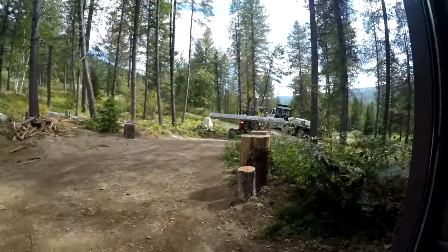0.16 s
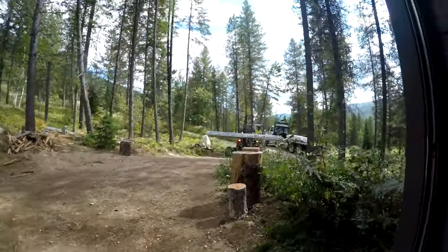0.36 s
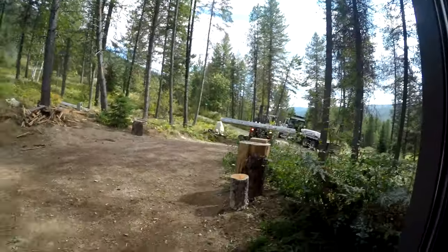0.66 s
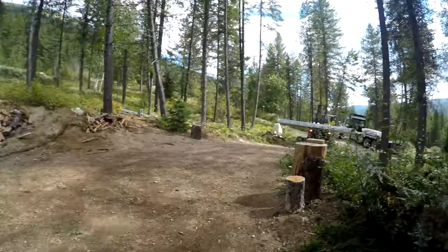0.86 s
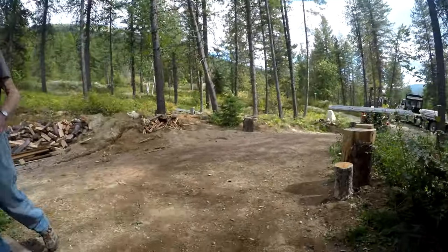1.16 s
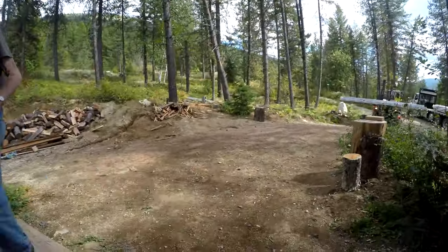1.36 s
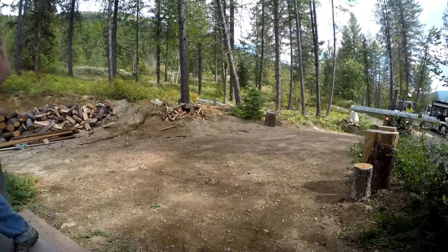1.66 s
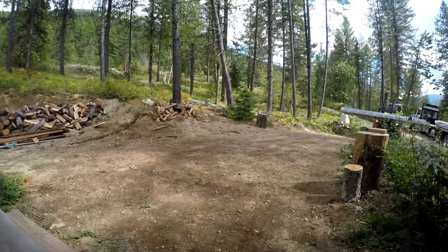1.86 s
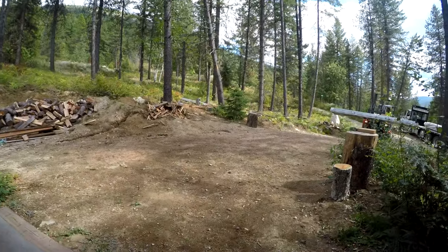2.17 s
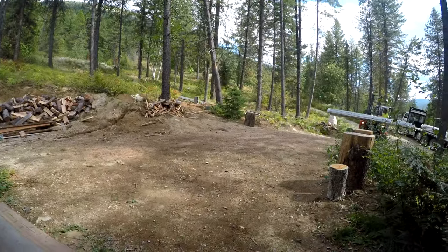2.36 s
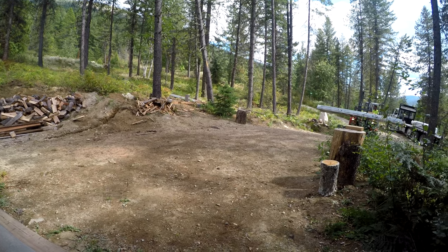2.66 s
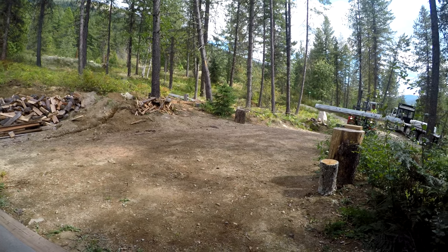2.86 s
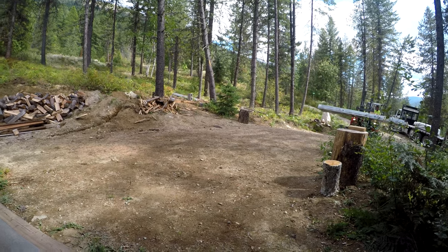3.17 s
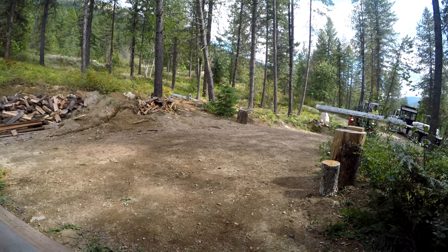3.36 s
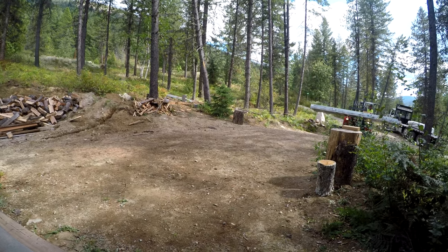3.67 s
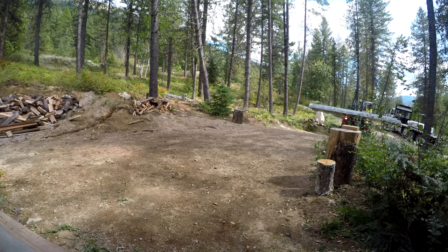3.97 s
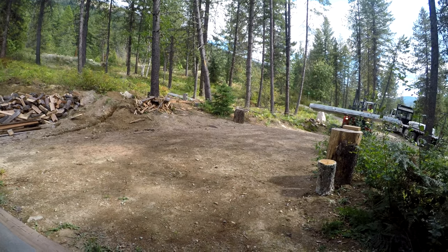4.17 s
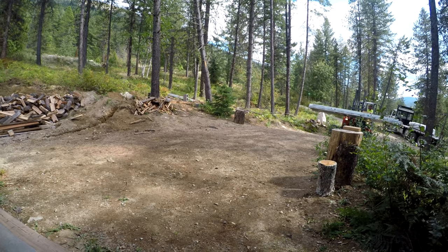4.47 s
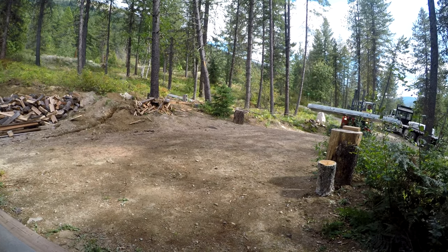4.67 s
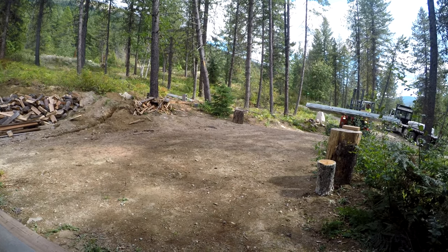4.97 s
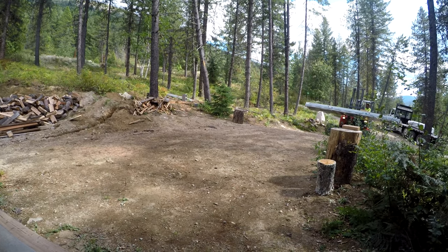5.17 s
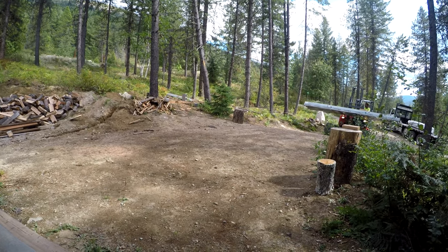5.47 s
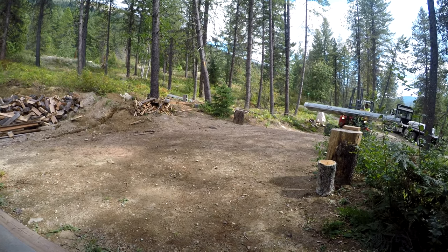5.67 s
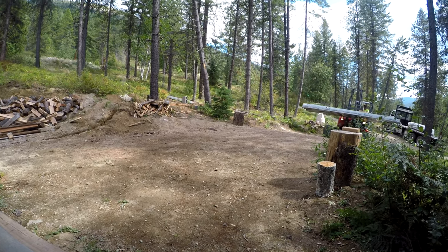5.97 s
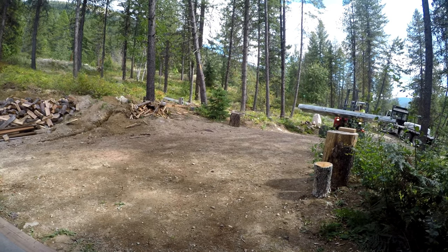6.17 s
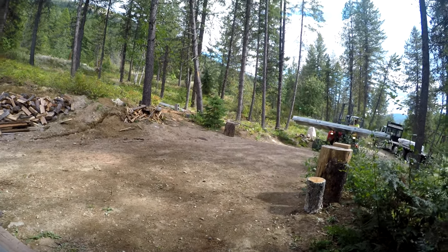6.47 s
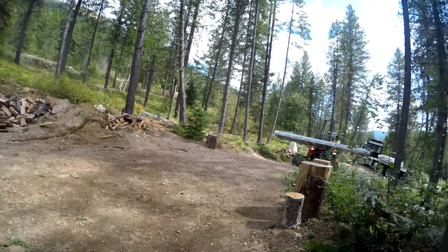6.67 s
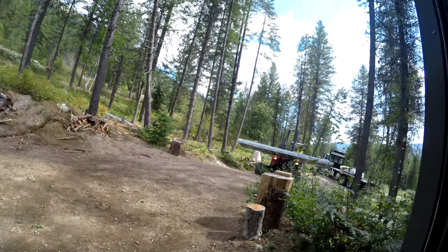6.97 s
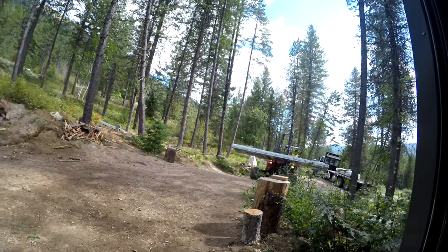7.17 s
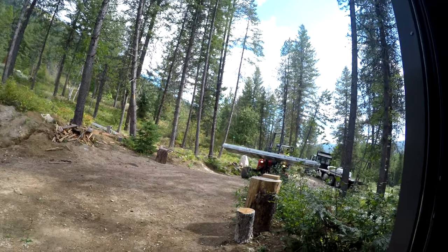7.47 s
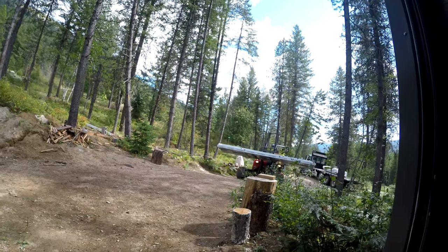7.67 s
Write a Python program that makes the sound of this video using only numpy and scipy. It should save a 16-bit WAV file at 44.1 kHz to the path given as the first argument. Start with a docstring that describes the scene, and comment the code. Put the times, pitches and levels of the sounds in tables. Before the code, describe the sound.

Steady low diesel throb and idling lorry outdoors, pump whine flickering on top, one woody heel knock early, gritty scuffs and ticking near the end.

```python
"""Forklift and idling lorry in a dirt yard

A three-cylinder diesel forklift works while its six-cylinder lorry idles: sines at multiples of each engine's cycle rate.
Noise shaped by spectra makes exhaust, engine body, fan and hiss; short bursts through resonances make the ticks.
A thin whistle flutters and clothing rustles. Filtered noise makes a broad burst as the sound begins, then
someone near scuffing over boards and grit.
The two microphone ports differ in level and phase across the band, most plainly in its middle."""
import sys
import numpy as np
from scipy import signal
from scipy.fft import rfft, irfft, next_fast_len
from scipy.io import wavfile
from scipy.ndimage import uniform_filter1d, minimum_filter1d, map_coordinates

SR = 44100
rng = np.random.default_rng(int(sys.argv[2]) if len(sys.argv) > 2 else 0)


def inscribe(sig):
    """Save sig as 16-bit PCM at rate SR to the path in sys.argv[1].

    A 1-D sig is mono; a 2-D sig holds one channel per row.
    Samples are clipped to [-1, 1] before scaling.
    """
    pcm = np.round(np.clip(np.atleast_2d(sig).T, -1, 1) * 32767)
    wavfile.write(sys.argv[1], SR, pcm.astype(np.int16))


N = 344862  # samples


def amp(db):
    """Amplitude factor for a level in dB."""
    return 10 ** (np.asarray(db) / 20)


def unit(x):
    """x brought to an rms of one."""
    return x / np.sqrt(np.mean(x ** 2) + 1e-20)


def along(points, hz):
    """Read (Hz, value) points on a log frequency axis."""
    f, v = np.transpose(points)
    return np.interp(np.log(hz + 1), np.log(f + 1), v)


def curves(rows):
    """One value per sample for each column after the time."""
    s, *columns = np.transpose(rows)
    return [np.interp(np.arange(N) / SR, s, column) for column in columns]


def wobble(rate):
    """A smooth random curve with rate knots a second."""
    coarse = np.arange(0, N + 64, 64)
    knots = rng.standard_normal(int(N * rate / SR) + 4)
    return np.interp(np.arange(N), coarse, map_coordinates(knots, [coarse * rate / SR]))


def filtered(x, response):
    """x times a complex response of frequency."""
    m = next_fast_len(N + SR // 2)
    return irfft(rfft(x, m) * response(np.fft.rfftfreq(m, 1 / SR)), m)[..., :N]


def coloured(x, spectrum):
    """x shaped by a spectrum in dB, then brought to an rms of one."""
    return unit(filtered(x, lambda hz: amp(along(spectrum, hz))))


def noise():
    """Two unrelated white noises."""
    return rng.standard_normal((2, N))


def tone(turns, db, waver_db):
    """A sine on a running phase, db rms, whose level wavers."""
    level = np.sqrt(2) * amp(db + waver_db * wobble(9))
    return level * np.sin(2 * np.pi * (turns + rng.random()))


# Forklift engine speed. Each row: time in seconds, cycles a second.
SPEED = [(0, 12.38), (.5, 12.49), (1.07, 12.46), (1.13, 12.624), (1.33, 12.651), (1.66, 12.656),
         (1.8, 12.78), (1.97, 12.8), (2.08, 12.7), (2.16, 12.7), (2.5, 12.705), (2.66, 12.622),
         (3.1, 12.57), (3.49, 12.643), (3.83, 12.573), (4.33, 12.715), (5.16, 12.711), (5.66, 12.663),
         (6.49, 12.664), (6.7, 12.585), (6.82, 12.596), (6.97, 12.735), (7.1, 12.735), (7.3, 12.632),
         (7.67, 12.63), (7.82, 12.75)]


def cycle():
    """Running count of forklift engine cycles."""
    return np.cumsum(curves(SPEED)[0]) / SR


# Swell of the fan roar, followed in part by other layers. Each row: time in seconds, gain in dB.
SWELL = [(0, 4), (.25, 2.5), (1, -1.5), (1.3, 2), (2, 0), (6.3, 0), (6.5, 5.5), (7, 5), (7.3, 5.5),
         (7.5, 7.5), (7.82, 6.5)]


def swell():
    """Gain in dB at each sample as the fan roar comes forward and draws back."""
    return curves(SWELL)[0]


def shade():
    """Gain in dB: some middle overtones start 10.5 dB lower and climb over the first 3.2 s."""
    return -10.5 * np.clip(1 - np.arange(N) / SR / 3.2, 0, 1)


# Forklift engine orders. Each row: multiple of the cycle rate, level in dB rms before any waver, swell or shade.
ORDERS = [(3.0, -28), (6.0, -23), (9.0, -29), (19.0, -40), (22.0, -35), (30.0, -37), (31.0, -36),
          (33.0, -36), (35.0, -42), (37.0, -35), (38.0, -43), (39.0, -38), (44.0, -44), (45.0, -44),
          (47.0, -43), (48.0, -42), (57.0, -52), (59.0, -54), (66.0, -56), (67.0, -60), (68.0, -56),
          (69.0, -53), (70.0, -58), (71.0, -59), (73.0, -60), (74.0, -58), (75.0, -59), (76.0, -62),
          (78.0, -60), (80.0, -57), (87.0, -60), (90.0, -51), (91.0, -59), (92.0, -52), (93.0, -54),
          (94.0, -60), (96.0, -59), (99, -63), (104, -63), (106, -60), (109, -62), (110, -64), (41, -43),
          (102, -63), (115, -64)]
KNOCK_LOW, KNOCK_HIGH = 87, 96  # orders in this range belong to the knock


def engine_orders():
    """Firing and rotating parts sound at multiples of the cycle rate, so they follow the speed."""
    turns = cycle()
    return sum(tone(k * turns, db, waver_db=0.2) for k, db in ORDERS if not KNOCK_LOW <= k <= KNOCK_HIGH)


def engine_knock():
    """High orders in step peak together once a cycle, which makes a pulse."""
    turns = cycle() - .55  # the peak falls at this share of the cycle
    gain_db = shade() + .5 * swell()
    return sum(np.sqrt(2) * amp(db + gain_db) * np.cos(2 * np.pi * k * turns)
               for k, db in ORDERS if KNOCK_LOW <= k <= KNOCK_HIGH)


# Gear hum. Each row: time in seconds, level in dB rms before its waver.
GEAR = [(0.0, -18), (0.06, -15.5), (1.22, -22.5), (1.37, -31), (1.39, -23), (1.74, -27), (2.18, -20),
        (2.52, -26), (2.68, -21), (2.9, -37), (2.98, -23), (3.31, -21), (3.33, -26.5), (3.96, -18.5),
        (4.16, -26), (4.2, -21.5), (4.44, -24.5), (5.34, -21), (6.62, -24.5), (6.66, -19), (6.82, -20.5),
        (6.97, -33.5), (7.08, -23), (7.82, -25)]
# Hydraulic pump hum. Each row: time in seconds, level in dB rms before its waver.
PUMP = [(0.0, -38), (0.04, -28.5), (1.04, -28.5), (1.11, -34), (1.15, -26.5), (2.07, -20), (2.5, -21.5),
        (2.59, -43.5), (2.72, -26.5), (3.11, -35), (3.94, -36), (4.01, -24.5), (4.22, -27), (4.85, -21.5),
        (5.51, -27), (6.18, -24.5), (6.49, -36.5), (6.51, -27.5), (6.73, -36), (6.86, -21), (7.14, -17),
        (7.43, -34.5), (7.8, -18.5), (7.82, -23)]
# Fan blade tone. Each row: time in seconds, level in dB rms before its waver.
BLADES = [(0, -35.5), (.35, -24.5), (.55, -23), (.8, -21.5), (1.1, -29), (1.4, -34), (2.2, -46), (3.4, -31),
          (4.2, -38), (5.1, -36.5), (6.1, -27.5), (6.5, -32.5), (6.75, -28.5), (7.82, -38.5)]


def hums():
    """Gear, pump and fan blades each hum at a multiple of the cycle rate."""
    turns = cycle()
    gear = tone(24 * turns, curves(GEAR)[0], waver_db=1.0)
    pump = tone(36 * turns, curves(PUMP)[0], waver_db=1.16)
    blades = tone(20.5 * turns, curves(BLADES)[0], waver_db=3.0)
    return gear + pump + blades


# Middle pump overtones. Each entry: multiple of the cycle rate, then level in dB rms before
# waver, swell and shade, and share of the swell.
MIDDLE_OVERTONES = {54: (-38, .2), 72: (-43.5, 0)}
# Lower sideband of the whine and higher pump overtones. Each row: time in seconds, then the level
# in dB rms, before its waver, of multiples 105, 144, 180 and 252 of the cycle rate.
UPPER_OVERTONES = [(0, -61.5, -64, -71.5, -72), (1.5, -54, -63, -79, -69), (2.4, -52.5, -62, -77, -71.5),
                   (3.3, -49, -64, -80, -70.5), (4.8, -52.5, -70.5, -78, -71.5), (5.3, -48, -70, -86, -71),
                   (6.2, -50, -63.5, -78, -73.5), (6.5, -47, -61, -67.5, -67.5), (7.0, -45, -63, -64, -70),
                   (7.3, -42, -63, -57.5, -65), (7.45, -44, -63, -65, -53), (7.7, -50, -62, -62, -53),
                   (7.82, -52, -62, -63, -59)]


def pump_overtones():
    """Harmonics of the pump, and a sideband of its whine, each waver in level."""
    turns, swell_db, shade_db = cycle(), swell(), shade()
    middle = sum(tone(k * turns, db + share * swell_db + shade_db * (k == 72), waver_db=1.14)
                 for k, (db, share) in MIDDLE_OVERTONES.items())
    upper_levels = zip((105, 144, 180, 252), curves(UPPER_OVERTONES))
    return middle + sum(tone(k * turns, db, waver_db=2.5) for k, db in upper_levels)


# Pump whine under load. Each row: time in seconds, level in dB rms before its waver.
WHINE = [(0, -50), (.15, -47), (.3, -46), (.54, -44), (.72, -45), (.85, -43), (.94, -43), (1.07, -40),
         (1.2, -39.5), (1.28, -41), (1.37, -36), (1.62, -40.5), (1.74, -37), (1.85, -44), (1.98, -41.5),
         (2.1, -45), (2.35, -42.5), (2.52, -45.5), (2.7, -53), (3.1, -48), (3.5, -50.5), (3.8, -42.5),
         (4.1, -49), (4.7, -47), (5.1, -51.5), (5.5, -50), (5.85, -43.5), (6.2, -48), (6.45, -41),
         (6.85, -45), (7.0, -43), (7.28, -40.5), (7.34, -36), (7.45, -35.5), (7.82, -36)]
# Breaks in the whine. Each row: middle in seconds, length in seconds.
BREAKS = [(0.788, 0.079), (1.112, 0.027), (1.308, 0.054), (1.765, 0.025), (2.028, 0.022), (2.104, .04),
          (7.786, 0.22)]


def pump_whine():
    """The pump whines under load and drops to about a tenth when it unloads."""
    t = np.arange(N) / SR
    dips = [1 - 0.91 * np.exp(-(2 * (t - s) / length) ** 6) for s, length in BREAKS]
    return np.prod(dips, axis=0) * tone(108 * cycle(), curves(WHINE)[0], waver_db=0.6)


# Lorry engine orders. Each row: multiple of the idle cycle rate, level in dB rms before its waver.
IDLE = [(2, -48), (4, -39), (6, -23), (8, -43), (12, -47), (16, -43), (17, -37), (18, -36), (20, -38),
        (22, -43)]
# Steady-pitched lorry hums. Each row: frequency in Hz, level in dB rms before its waver.
LORRY_HUMS = [(42.4, -43), (107.5, -28.5)]


def lorry():
    """The idling engine holds its speed, so its orders and hums keep their pitch."""
    t = np.arange(N) / SR
    idle_hz = 7.511  # engine cycles a second
    firing = sum(tone(k * idle_hz * t, db, waver_db=.6) for k, db in IDLE)
    return firing + sum(tone(hz * t, db, waver_db=2.5) for hz, db in LORRY_HUMS)


# Injector and valve ticks. Each row: share of the cycle, relative level in dB.
TICKS = [(.115, -59.5), (.19, -64), (.445, -53.5), (.5, -60), (.56, -63), (.785, -55), (.84, -63),
         (.89, -62)]
# Cylinder head resonances. Each row: centre in Hz, width in Hz, relative level in dB per pass.
HEAD_MODES = [(1800, 350, -6), (3190, 420, 7.5), (3430, 330, 5), (4600, 700, -15)]
# Tick timing. Each row: time in seconds, how much earlier as a share of the cycle (negative is later).
ADVANCE = [(0, -.012), (3, -.006), (5, .01), (7.82, .017)]
# Tick loudness. Each row: time in seconds, gain in dB on ticks of unit rms.
TICKING = [(0, -56.5), (.7, -57.5), (.95, -68), (1.3, -68), (2, -66), (3, -62.5), (5, -61), (6.2, -61.5),
           (6.6, -61), (7, -58.5), (7.3, -56.5), (7.45, -52), (7.56, -48), (7.82, -50)]


def head(hz):
    """Resonances of the cylinder head, summed with alternating sign."""
    return sum((-1) ** k * amp(db) * 1j * hz * w / (c * c - hz * hz + 1j * hz * w)
               for k, (c, w, db) in enumerate(HEAD_MODES))


def ticks():
    """At set crank angles a sharp blow and a dying rattle ring the cylinder head."""
    turns, rattle, blows = cycle() + curves(ADVANCE)[0], np.zeros(N), np.zeros(N)
    for share, db in TICKS:
        since = (turns - share) % 1  # in cycles
        count = np.floor(turns - share).astype(int)
        size_db = db + 1.2 * rng.standard_normal(128)[count % 128]  # uneven from cycle to cycle
        rattle += amp(size_db - 60 * since / .2) * (1 - np.exp(-since / .008))
        blows += amp(size_db + 16) * np.diff(count, prepend=count[0])
    # the blows enter one sound of the pair, the rattle both
    struck = blows * [[np.sqrt(2)], [0]] + rattle * noise()
    return amp(curves(TICKING)[0]) * unit(filtered(struck, lambda hz: head(hz) ** 2))


def repeating():
    """Noise that comes back the same in every engine cycle."""
    count = 2 ** 11  # points a cycle
    place = cycle() % 1 * count
    return np.array([np.interp(place, np.arange(count), p) for p in rng.standard_normal((2, count))])


def throbbing():
    """Noise that swells with the three firings of a cycle."""
    return amp(1.4 * np.cos(2 * np.pi * 3 * cycle())) * noise()


# Exhaust spectrum. Each row: frequency in Hz, relative density in dB per Hz.
EXHAUST = [(8, -120), (20, -43), (35, -25.5), (60, -13), (95, -10), (130, -7.5), (165, -6), (195, 4.5),
           (245, -7), (285, -4), (390, -5), (430, -8), (600, -20.5), (760, -39.5), (1500, -120)]


def exhaust():
    """Low noise of the gas flow, slightly lower as the fan roar swells."""
    level_db = -19 - 0.14 * swell() + 1.1 * wobble(2.514) + 0.52 * wobble(6.6)
    return amp(level_db) * coloured(noise(), EXHAUST)


# Engine body spectrum. Each row: frequency in Hz, relative density in dB per Hz.
BODY = [(200, -120), (400, -20), (480, -2.5), (620, -3.5), (700, -10), (790, -14), (900, -17),
        (1070, -20.5), (1300, -22), (1450, -29.5), (1700, -41.5), (2600, -120)]
# Engine body loudness. Each row: time in seconds, level in dB rms before its wobble.
BODY_LEVEL = [(0, -31), (.22, -37), (.6, -33.5), (1.0, -30), (1.2, -28), (3, -27), (5, -29.5), (6.5, -27.5),
              (7.3, -28), (7.5, -25), (7.82, -26.5)]


def engine_body():
    """The engine's shell radiates throbbing noise, part of it the same every cycle."""
    level_db = curves(BODY_LEVEL)[0] + 0.84 * wobble(6)
    return amp(level_db) * coloured(throbbing() + .33 * repeating(), BODY)


# Fan roar spectrum. Each row: frequency in Hz, relative density in dB per Hz.
FAN = [(600, -120), (1000, -36), (1400, -0.5), (1520, -6.5), (1820, -4.5), (1950, -10.5), (2300, -18),
       (2600, -24.5), (2900, -17), (3200, -13), (3480, -13.5), (3750, -23), (4500, -40.5), (7000, -120)]


def fan_roar():
    """Air noise of the fan throbs with the firings and takes the whole swell."""
    level_db = -50.5 + swell() + 0.9 * wobble(9.1)
    return amp(level_db) * coloured(throbbing() + .4 * repeating(), FAN)


# Hiss spectrum. Each row: frequency in Hz, relative density in dB per Hz.
HISS = [(1800, -120), (3000, -32), (3800, -2), (4500, 1), (4950, -7.5), (6000, -9.5), (7700, -7),
        (8000, -9.5), (10200, -15), (11200, -24.5), (12500, -28.5), (13400, -39.5)]
HISS_DB = -63  # rms, before wobble or swell


def hiss():
    """High noise, part of it the same every cycle."""
    return amp(HISS_DB + 1.4 * wobble(8.8)) * coloured(noise() + 0.27 * repeating(), HISS)


def echoed_hiss():
    """Added hiss, different at each port, stronger the further the swell is from zero."""
    added_power = np.abs(amp(2 * 0.42 * swell()) - 1)
    return amp(HISS_DB) * np.sqrt(added_power) * coloured(noise(), HISS)


# Likeness of the two ports. Each row: frequency in Hz, likeness (1 is the same, 0 unrelated).
ALIKE = [(100, .9997), (200, .9995), (430, .997), (780, .94), (950, 1), (1300, 0.9), (1700, .9),
         (2000, .85), (2400, .5), (2850, .4), (3250, .85), (3750, .68), (4400, .7), (4950, 0.67),
         (5600, .68), (8000, .6), (10500, .12), (13000, .06)]


def scattered(pair):
    """Mix two unrelated sounds so that left and right are as alike as the yard's echoes leave them."""
    def weights(hz):
        turn = np.arccos(np.clip(along(ALIKE, hz), -1, 1)) / 2
        return np.array([np.cos(turn), np.sin(turn)])
    mid, side = filtered(pair, weights)
    return np.array([mid + side, mid - side])


# Thin high whistle. Each row: time in seconds, level in dB rms before its flutter.
WHISTLE = [(0, -94.5), (3, -89.5), (6.4, -84.5), (6.5, -75), (6.9, -75.5), (7.4, -75), (7.6, -88),
           (7.82, -88)]


def whistle():
    """A faint tone flutters in level and phase, separately at each port, and comes forward late."""
    turns = 5993 * np.arange(N) / SR
    return np.array([amp(2.5 * wobble(45)) * tone(turns + .1 * wobble(60), curves(WHISTLE)[0], waver_db=1.3)
                     for port in "LR"])


# Clothing loudness. Each row: time in seconds, level in dB rms before its wobble.
RUSTLE = [(0, -59), (.15, -60.5), (.35, -55.5), (.75, -59), (1.3, -69), (7.82, -77.5)]
# Cloth spectrum. Each row: frequency in Hz, relative density in dB per Hz.
CLOTH = [(1300, -60), (1700, 0), (2300, -2), (2800, -9), (3800, -31.5), (5500, -49.5), (6100, -25.5),
         (6700, -17.5), (7600, -14), (8100, -24.5), (9500, -69.5)]


def rustle():
    """Uneven cloth noise, a dull wash under a thin high band."""
    return amp(curves(RUSTLE)[0] + 3 * wobble(25)) * coloured(noise(), CLOTH)


def rough(n, size):
    """Random unevenness of unit spread, smoothed over size samples."""
    return uniform_filter1d(rng.standard_normal(n), size=size) * np.sqrt(size)


def banded(order, band, x):
    """x through a bandpass with edges in Hz, brought to an rms of one."""
    return unit(signal.lfilter(*signal.butter(order, band, "bandpass", fs=SR), x))


# Noise bursts: a broad burst as the sound begins, then shoes on grit. Each row: start of the hold in seconds,
# rise, hold and fall in seconds, lower band level in dB, upper band level in dB (both before the dulling),
# top of the upper band in Hz.
NOISE_BURSTS = [(.006, 0.0083, 0.0088, .008, -41, -41, 7000), (0.054, .012, .015, 0.018, -50, -57, 7000),
                (.275, 0.016, .025, .03, -69.5, -55, 10550), (.835, .005, .02, .02, -69.5, -56, 10950),
                (1.235, .012, .01, .02, -65.5, -55, 7500), (1.315, .025, .02, .04, -56, -70.5, 7000),
                (1.58, .01, .005, .018, -71, -58, 9000), (1.757, .01, .005, .02, -70, -57, 9000),
                (2.699, .015, .005, 0.027, -57, -71.5, 6960), (6.371, 0.017, .005, .02, -52, -69.5, 7000),
                (6.455, .003, .04, .035, -44.5, -49.5, 10000), (6.6, .03, 0.028, .04, -55, -60.5, 8000),
                (6.711, .006, .02, 0.048, -49, -54.5, 7500), (6.794, .015, .085, 0.044, -48.5, -53, 8900),
                (7.074, .005, .04, 0.043, -52, -60, 7500), (7.231, .03, .09, .04, -53, -58.5, 7500),
                (7.345, .005, .01, 0.013, -56, -56, 12500), (7.44, .04, .06, .02, -48.5, -53.5, 10970),
                (7.535, .012, .062, .012, -47, -46.5, 13000), (7.638, 0.022, .07, .03, -51.5, -57, 10470),
                (7.774, .005, .014, .012, -46, -46, 13000)]


def noise_bursts():
    """Uneven noise in a lower and an upper band, different at each port; for shoes, a drag under grit."""
    t, out = np.arange(N) / SR, np.zeros((2, N))
    for s, rise, hold, fall, lower_db, upper_db, top_hz in NOISE_BURSTS:
        part = slice(max(round((s - .15) * SR), 0), round((s + .35) * SR))
        u = t[part] - s
        uneven_db = 2 * rough(len(u), size=60) + 1.8 * rough(len(u), size=350)  # fine, coarse
        grains = amp(uneven_db) * rng.standard_normal((2, len(u)))
        lower = banded(2, (1900, 3560), grains)
        upper = banded(2, (3500, min(top_hz, SR / 3)), grains)
        envelope = np.exp(np.minimum(0, np.minimum(u / rise, (hold - u) / fall)))
        out[:, part] += envelope * (amp(lower_db) * lower + amp(upper_db) * upper)
    return out


# Single blows. Each row: start in seconds, level in dB before envelope and dulling, centre in Hz,
# band edges as a ratio to the centre, decay time constant in seconds.
KNOCKS = [(6.37, -27, 65, 1.9, .04), (6.3972, -25.5, 5000, 2.4, .001), (6.462, -37, 2650, 1.12, .005),
          (7.345, -41, 2800, 1.15, .004), (7.778, -42, 4400, 1.15, .004)]


def knocks():
    """Short bursts of band noise, the same at both ports."""
    out, u = np.zeros((2, N)), np.arange(SR // 5) / SR
    for s, db, hz, wide, decay in KNOCKS:
        start = round(s * SR)
        burst = banded(3, [hz / wide, hz * wide], rng.standard_normal(len(u)))
        blow = burst * np.exp(-u / decay) * (1 - np.exp(-2 * u / decay))
        out[:, start:start + len(u)] += amp(db) * blow[:N - start]
    return out


# Ringing board. Each row: frequency in Hz, relative level in dB, time to fall 60 dB in seconds.
BOARD = [(600, 2.5, .06), (750, -8.5, .05), (880, -8.5, .06), (1140, -14.5, 0.04), (1346, -8, 0.032),
         (1690, -17.5, .04), (2170, -27, .03), (2810, -32, .03), (3550, -31.5, 0.082), (3900, -33, .05),
         (4700, -37, .03)]


def heel():
    """A heel comes down on a board: its modes ring over a broad tap."""
    out, u, start = np.zeros((2, N)), np.arange(SR // 5) / SR, round(.831 * SR)
    ring = sum(amp(db - 60 * u / t60) * np.sin(2 * np.pi * hz * u) for hz, db, t60 in BOARD)
    tap = amp(-28 - 60 * u / .04) * banded(2, (1500, 4500), rng.standard_normal((2, len(u))))
    out[:, start:start + len(u)] += amp(-14.5) * (ring + tap) * (1 - np.exp(-u / 0.0018))
    return out


# Dulling of near sounds by the housing. Each row: frequency in Hz, gain in dB.
DULLING = [(4600, 0.5), (5600, -6.5), (7500, -8), (10300, -9), (11100, -14.5), (13400, -20.5)]


def near_sounds():
    """Noise bursts, knocks and heel, with the treble dulled by the housing."""
    return filtered(noise_bursts() + knocks() + heel(), lambda hz: amp(along(DULLING, hz)))


def scene():
    """Forklift and lorry tones, machine noise spread over the ports, and the near sounds."""
    forklift = engine_orders() + engine_knock() + hums() + pump_overtones() + pump_whine()
    roar = scattered(exhaust() + engine_body() + fan_roar() + hiss() + ticks()) + echoed_hiss()
    return forklift + lorry() + roar + whistle() + rustle() + near_sounds()


# Level between the ports. Each row: frequency in Hz, left minus right in dB.
TILT = [(100, 0), (258, -.4), (430, -1.7), (600, -5), (780, -9), (950, -7), (1120, -4), (1400, -1.5),
        (1900, 2.5), (2500, 3.5), (3200, -1), (3750, -1.5), (4300, -4.5), (5500, 7), (7000, 2.5),
        (9000, -3), (13000, -2.5)]
# Phase between the ports. Each row: frequency in Hz, lead of the left in radians.
LEAD = [(30, -0.035), (90, -0.04), (130, -0.06), (260, -0.09), (620, -0.12), (780, 0.5), (950, 1.06),
        (1400, 1.24), (2000, 0.8), (2300, 0), (2550, -2), (2850, -0.5), (3300, 0), (4500, 0), (4950, 2),
        (5350, 4), (13000, 4)]


def ports(hz):
    """Left and right responses: they share the phase lead and, up to a limit, keep the mean level."""
    lead = along(LEAD, hz)
    ratio = amp(along(TILT, hz)) * np.exp(1j * lead)
    share = 2 * np.exp(-.5j * lead) / np.maximum(np.abs(1 + ratio), 1.2)
    return share * np.array([ratio, 1 + 0 * hz])


def record(dry):
    """Soft ends, then the two ports, a limiter that eases peaks, and a band limit."""
    fade = np.minimum(1, np.minimum(np.arange(N), np.arange(N)[::-1]) / 90)
    x = filtered(dry * np.sin(np.pi / 2 * fade) ** 2, ports)
    needed = np.minimum(1, .59 / (np.abs(x).max(axis=0) + 1e-9)) ** .8  # part of the full reduction
    gain = uniform_filter1d(uniform_filter1d(minimum_filter1d(needed, size=401), size=200), size=200)
    return filtered(x * gain, lambda hz: hz < 13480)


dry = scene()
out = record(dry)
inscribe(out)
```